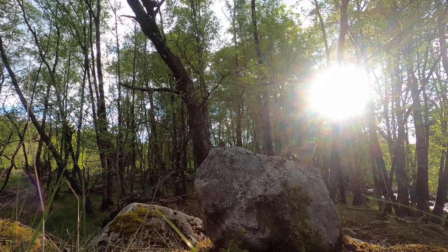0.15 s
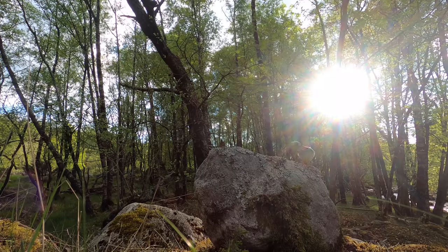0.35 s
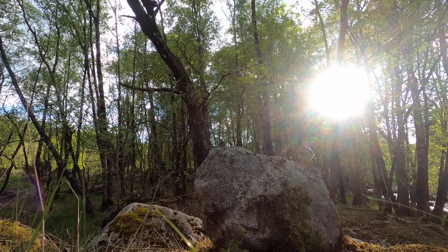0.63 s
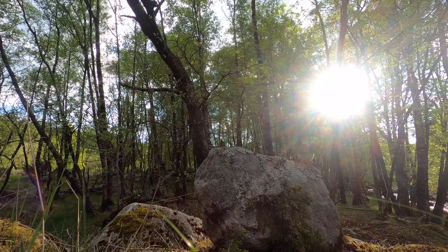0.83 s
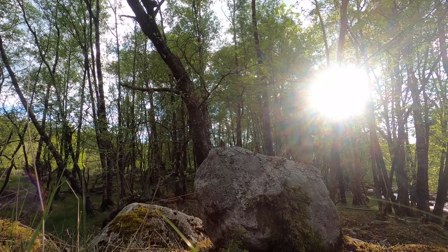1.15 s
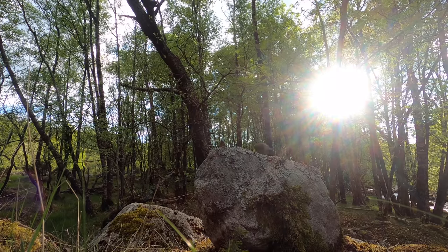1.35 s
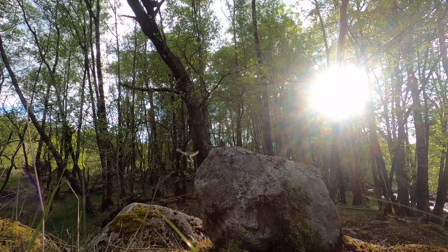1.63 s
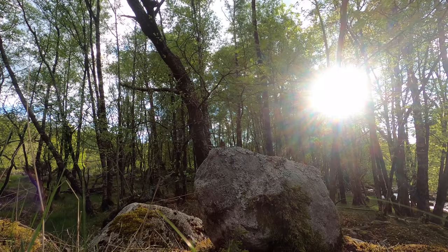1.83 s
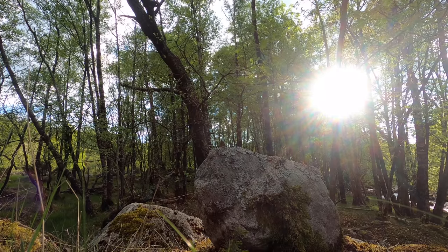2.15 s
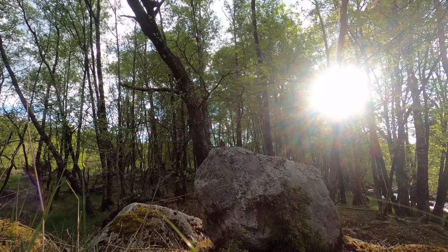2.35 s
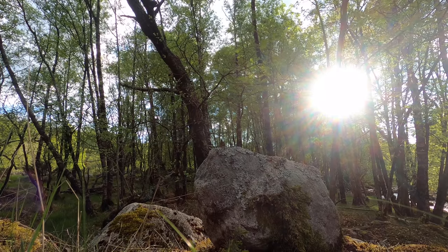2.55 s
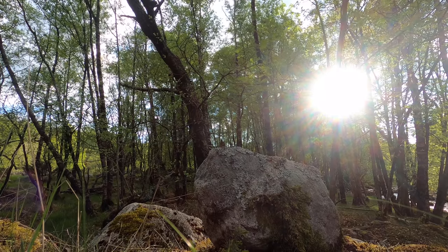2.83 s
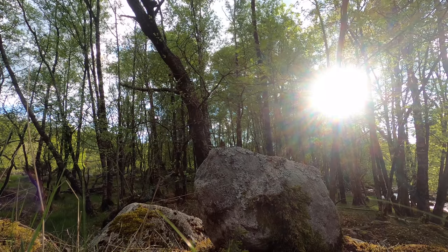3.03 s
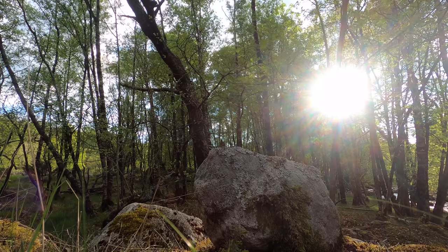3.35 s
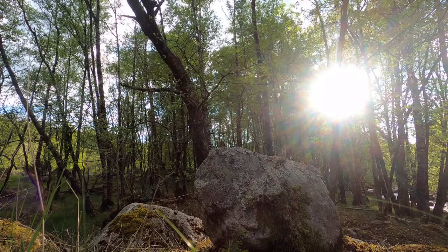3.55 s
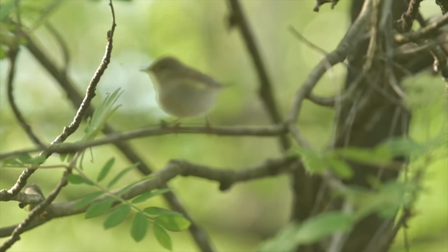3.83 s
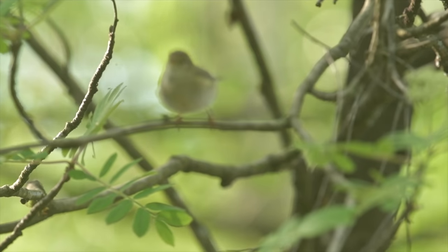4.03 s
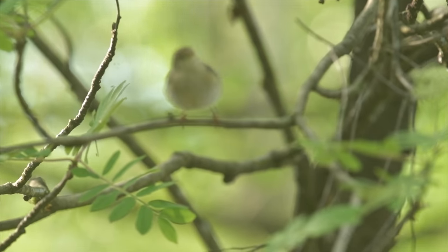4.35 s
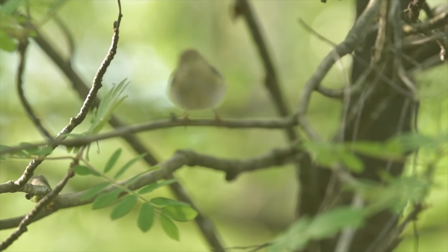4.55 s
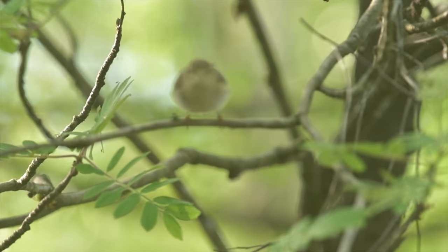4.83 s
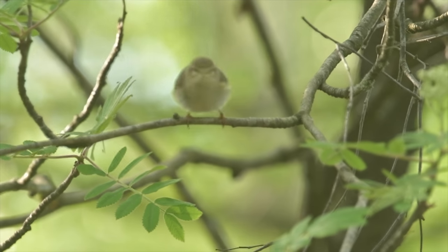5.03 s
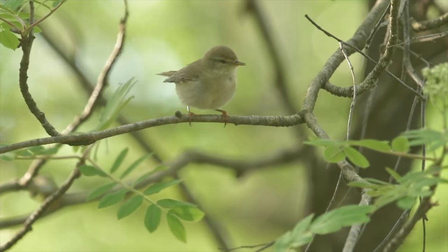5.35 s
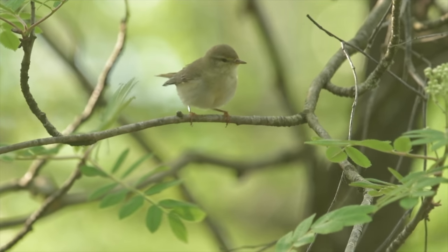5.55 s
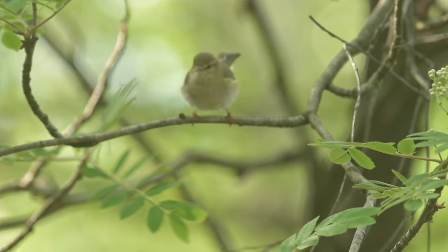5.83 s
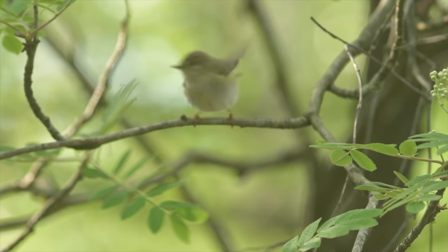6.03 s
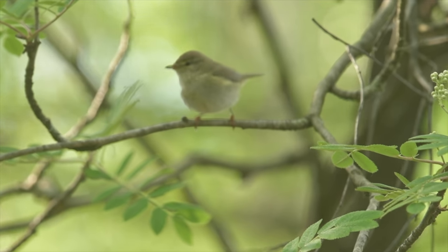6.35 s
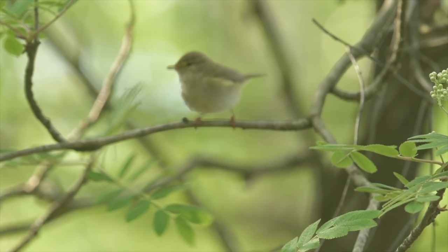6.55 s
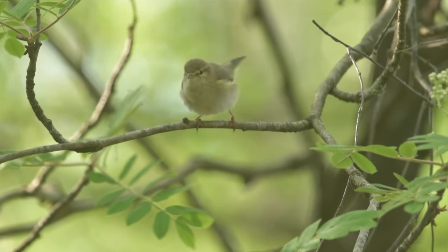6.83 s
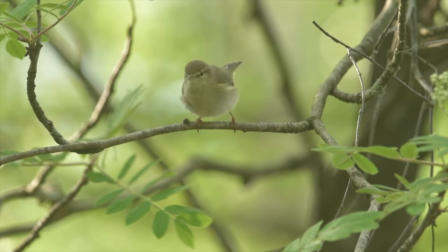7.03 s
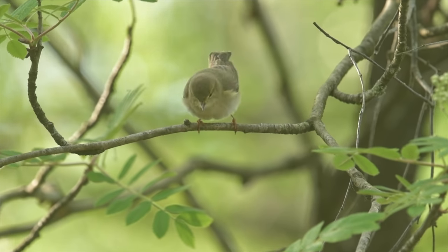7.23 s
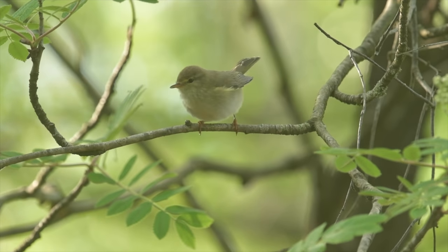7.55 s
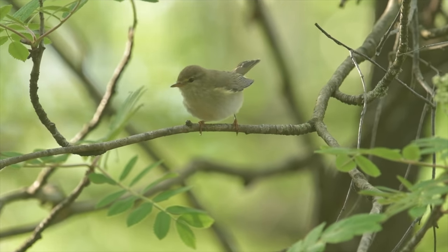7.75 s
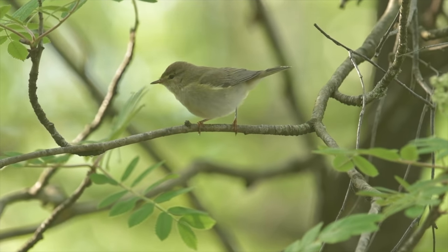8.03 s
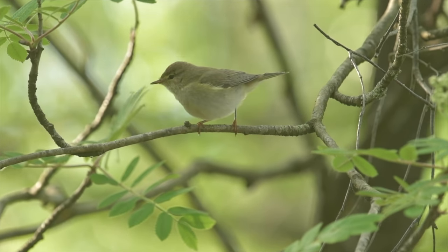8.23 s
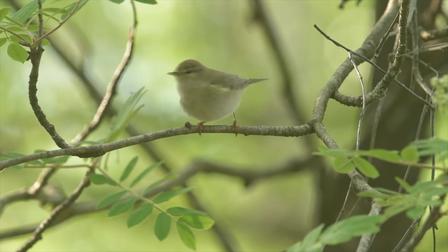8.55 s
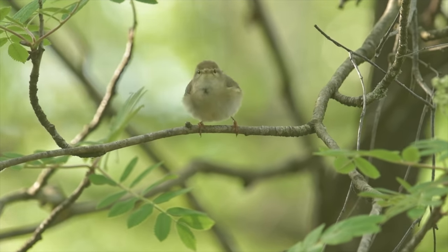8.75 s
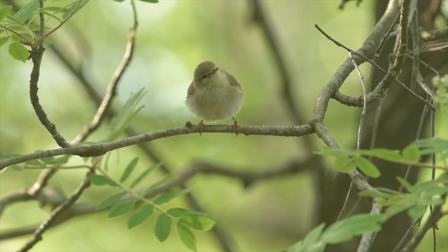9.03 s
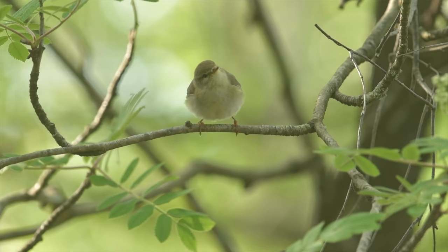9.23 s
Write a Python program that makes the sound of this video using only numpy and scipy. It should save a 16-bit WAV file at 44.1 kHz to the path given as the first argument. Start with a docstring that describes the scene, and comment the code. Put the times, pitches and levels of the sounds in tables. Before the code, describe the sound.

Several small songbirds take turns at different distances among trees. The closest sings rounded, gliding whistles first and ends on a low drop; remote birds answer with quick high slides, steady whistles and a wavering trill on the left. A quiet warbler phrase descends, then a clearer singer finishes with sinking syllables. Two faint wooden creaks come early, over a soft airy stereo background with deep rumble and an almost inaudible regular throb.

```python
"""A quiet wood: willow warblers sing falling phrases of pure whistled notes, scattered by the trunks.
Farther off, birds add high slurs, level whistles, a fast trill and a random twitter; each note is a gliding tone.
A tree creaks twice, in runs of slips that ring one resonance of the trunk.
Under it lie shaped noise for the distant rush and microphone hiss, a deep rumble and a faint regular throb."""
import sys
import numpy as np
from scipy import signal
from scipy.io import wavfile
from scipy.ndimage import uniform_filter1d

SR = 44100
rng = np.random.default_rng(int(sys.argv[2]) if len(sys.argv) > 2 else 0)


def store_pcm(level_fs):
    """Save levels as 16-bit WAV."""
    pcm = np.round(np.clip(level_fs, -1, 1) * 32767).astype(np.int16)
    wavfile.write(sys.argv[1], SR, np.atleast_2d(pcm).T)


N = 413658
TIME = np.arange(N) / SR


def gain_of(db):
    """Decibels to amplitude."""
    return 10 ** (np.asarray(db) / 20)


def evened(x):
    """Scales to rms 1."""
    return x / np.sqrt(np.mean(x ** 2) + 1e-20)


def read(points, hz):
    """Reads a table of (frequency [Hz], value) on a log-frequency axis."""
    f, value = np.transpose(points)
    return np.interp(np.log(hz + 1), np.log(f + 1), value)


def add(mix, s, sound):
    """Mixes a sound in at time s, in place."""
    part = mix[max(round(s * SR), 0):][:len(sound)]
    part += sound[:len(part)]


def filtered(x, hz, kind, order=2):
    """Butterworth filter."""
    return signal.sosfilt(signal.butter(order, hz, kind, fs=SR, output="sos"), x)


def drift(t, rate):
    """Random wandering about 0: normal draws, rate of them a second, joined by straight lines."""
    return np.interp((t - t[0]) * rate, np.arange(1024), rng.standard_normal(1024))


def sing(notes, waver=0.0028, flutter_db=1.5, overtone_db=-44):
    """Each note is one nearly pure tone of the syrinx gliding along its contour."""
    song = np.zeros(N)
    for note in notes:
        s, pitch_hz, level_db = np.transpose(note)
        t = np.arange(s[0] - .002, s[-1] + .002, 1 / SR)
        contour_hz = uniform_filter1d(np.interp(t, s, pitch_hz), size=220, mode="nearest")
        hz = contour_hz * (1 + waver * drift(t, 303.0))
        breath = np.interp(t, s, gain_of(level_db)) * gain_of(flutter_db * drift(t, 141))
        edges = signal.windows.tukey(len(t), min(1, 0.0076 * SR / len(t)))
        phase = 2 * np.pi * np.cumsum(hz) / SR
        tone = np.sin(phase) + gain_of(overtone_db) * np.sin(2 * phase)
        add(song, t[0], np.sqrt(2) * breath * edges * tone)
    return song


def repeated(syllable, rows):
    """The notes of one syllable sung again and again at new pitches and levels."""
    return [[(s + after, hz * factor, db + accent) for after, factor, accent in stroke]
            for s, hz, db in rows for stroke in syllable]


def glide(s, length, first_hz, middle_hz, last_hz, db, change_db=0, linger=0, edge_db=-7):
    """A note that bends through three pitches, softer at both ends; linger below 0 hurries the middle."""
    u = np.linspace(-1, 1, 17)
    travel = u + linger * (u * u * u - u)
    ends = u ** 8
    bend_hz = ((first_hz + last_hz) / 2 - middle_hz) * u ** 2
    hz = middle_hz + (last_hz - first_hz) / 2 * travel + bend_hz
    return np.c_[s + length * (u + 1) / 2, hz, db + change_db * u / 2 + edge_db * ends]


def slurs(rows, sag=.12):
    """Quick glides up or down that linger in the middle, which sags by a share of the span."""
    notes = []
    for s, length, first, last, db in rows:
        middle = (first + last) / 2 - sag * abs(last - first)
        notes.append(glide(s, length, first, middle, last, db, edge_db=-2, linger=0.454))
    return notes


def scatter(t60, delay, count):
    """Echoes from count trunks and branches, different at each microphone, dying away; energy 1."""
    taps = np.zeros((2, SR))
    for side in taps:
        late = rng.random(count) * min(t60, .9)
        side[((late + delay) * SR).astype(int)] = rng.choice([-1, 1], count) * gain_of(-60 * late / t60)
    return taps / np.linalg.norm(taps, axis=1, keepdims=True)


def wood(x, pan_db, near_db, far_db, near_t60=.15, far_t60=.85, shared=0.47):
    """Direct sound, quick echoes from the nearest trunks and the long tail; pan_db is left minus right."""
    near, same = scatter(near_t60, .002, count=120), np.clip(shared, 0, 1)
    # trunks ahead reach both microphones alike
    near[1] = same * near[0] + np.sqrt(1 - same ** 2) * near[1]
    far = scatter(far_t60, .025, count=1500)
    echoes = gain_of(near_db) * near + gain_of(far_db) * far
    heard = x + signal.fftconvolve(x[None], echoes, axes=1)[:, :N]
    return heard * gain_of(np.array([[1], [-1]]) * pan_db / 2)


# Spectrum of the wood's rush and hiss at the microphones: (frequency [Hz], relative density [dB])
AIR_SPECTRUM = [(25, -13), (60, -1), (120, 0), (200, -7.0), (400, -15.5), (800, -9.5), (1200, -8.5),
                (2000, -13.5), (3000, -17), (4500, -22.5), (7000, -22.5), (10000, -29), (15400, -33.5)]
# Likeness of the two microphones: (frequency [Hz], correlation [0 to 1])
AIR_LIKENESS = [(60, 0.62), (130, 0.27), (290, 0.41), (640, 0.55), (1410, 0.79), (3100, 0.61), (6820, 0.37),
                (15000, 0.032)]
# Balance of the two microphones: (frequency [Hz], left minus right [dB])
AIR_LEAN = [(60, 5.5), (130, -5), (290, 0), (640, -4.5), (1410, -4.0), (3100, -2.5), (6820, -1.5),
            (15000, 0)]


def air(level_db=-51, patchy_db=0.85):
    """The far rush of the wood and the microphones' hiss: shaped noise with slight drifting patches."""
    frames, hz = N // 512 + 5, np.fft.rfftfreq(2048, 1 / SR)
    a, b, c, d, patches = rng.standard_normal((5, frames, len(hz)))
    patches = uniform_filter1d(patches, size=14, axis=0)
    patches = evened(uniform_filter1d(patches, size=20, axis=1))
    same = np.clip(read(AIR_LIKENESS, hz), -1, 1)
    left = a + 1j * b
    right = same * left + np.sqrt(1 - same ** 2) * (c + 1j * d)
    lean_db = np.array([1, -1])[:, None, None] * read(AIR_LEAN, hz) / 2
    spectra = np.array([left, right]) * gain_of(read(AIR_SPECTRUM, hz) + patchy_db * patches + lean_db)
    noise = signal.istft(spectra.transpose(0, 2, 1), nperseg=2048, noverlap=1536)[1][:, :N]
    return gain_of(level_db) * noise / np.std(noise.mean(0))  # level of the two sides averaged


def rumble(level_db=-52.5, top_hz=30.3, bottom_hz=7.1, own_db=-11):
    """Deep band of noise, mostly common to both microphones."""
    noise = rng.standard_normal(N) + gain_of(own_db) * rng.standard_normal((2, N))
    low = filtered(noise, top_hz, "low")
    return gain_of(level_db) * evened(filtered(low, bottom_hz, "high"))


def throb(peak_db=-38.5, width=0.0073, corner_hz=8, swing=0.67, swing_lag=0.027):
    """A soft, strictly regular push and slower pull, below the bass."""
    start_s, period_s = .1825, .22752
    offset = (TIME - start_s + period_s / 2) % period_s - period_s / 2
    push = np.exp(-(offset / width) ** 2 / 2)
    pull = np.exp(-((offset - swing_lag) / (2 * width)) ** 2 / 2)
    pulses = filtered(push - swing * pull, corner_hz, "high", order=1)
    return gain_of(peak_db) * pulses / pulses.max()


# Distant twitter, before its place in the wood: (time [s], middle pitch [Hz], level [dB])
TWITTER_COURSE = [(2.55, 4360, -68), (3.3, 4500, -63.5), (3.6, 4580, -63), (4.3, 4700, -74)]


def twitter(per_s=34, spread=.24, length=.035, slur=.17):
    """Short falling slurs of random pitch from birds too far off to tell apart."""
    s, middle_hz, level_db = np.transpose(TWITTER_COURSE)
    starts = np.arange(s[0], s[-1], 1 / per_s)
    notes = []
    for start, (late, pitch) in zip(starts, rng.uniform(-1, 1, (len(starts), 2))):
        hz = np.interp(start, s, middle_hz) * (1 + spread * pitch)
        db = np.interp(start, s, level_db)
        start = start + late / per_s / 2
        notes.append([(start, hz, db), (start + length, hz * (1 - slur), db)])
    return sing(notes)


# Single slurs from deeper in the wood, before their place:
# (start [s], length [s], first pitch [Hz], last pitch [Hz], level [dB])
DEEP_WOOD_NOTES = [(.002, 0.018, 4930, 4870, -48), (2.75, 0.022, 5670, 5160, -56),
                   (2.838, .072, 6520, 6230, -62), (2.87, .06, 4100, 3900, -63),
                   (3.125, .06, 3850, 4000, -63), (4.435, 0.039, 4120, 4080, -60),
                   (5.895, 0.057, 3610, 3240, -60)]


def distant_birds():
    """Single gliding slurs and the twitter, with echoes of the nearest trunks louder than the direct sound."""
    birds = sing(slurs(DEEP_WOOD_NOTES)) + twitter()
    return gain_of(-5.5) * wood(birds, pan_db=1.5, near_db=3.5, far_db=0.0)


# Two creaks, before their place: (start [s], length [s], mean slip rate [1/s], level [dB])
CREAK_RUNS = [(.33, 0.31, 57, -55.5), (1.155, .41, 68, -51)]


def creak(unevenness=.1, slip_db=2.0):
    """Wood rubs on wood: a quick run of slips, each ringing one resonance of the trunk."""
    trunk_hz, damping_hz = 1444, 180
    attack_s, release_s = 0.029, .08
    out = np.zeros(N)
    age = np.arange(900) / SR
    ring = age * np.exp(-np.pi * damping_hz * age) * np.sin(2 * np.pi * trunk_hz * age)
    for s, length, rate, level_db in CREAK_RUNS:
        t = np.arange(0, length, 1 / SR)
        turns = np.cumsum(rate * (1 + unevenness * drift(t, 60))) / SR
        # one slip at each whole turn
        slips = np.diff(np.floor(turns), prepend=-1) * gain_of(slip_db * drift(t, 61))
        pressure = np.minimum(1, np.minimum(t / attack_s, (length - t) / release_s))
        ringing = evened(np.convolve(slips, ring)[:len(t)])
        add(out, s, ringing * pressure * gain_of(level_db))
    return out


def creaking_tree():
    """The slipping tree, left of the microphones, with strong echoes off the nearest trunks."""
    creaks = creak(unevenness=0.15, slip_db=2.0)
    return gain_of(-3.5) * wood(creaks, pan_db=8.5, near_db=2, far_db=-5)


# The three strokes of a trill syllable: (time after its start [s], pitch factor, accent [dB])
TRILL_STROKES = [
    [(0, 1.28, -13), (.006, 1.04, 3), (.016, .97, -2)],
    [(.019, .8, 0), (.029, 1, -1), (.035, .78, -5), (.053, .7, 0.5)],
    [(.056, .93, -8), (.066, 1.09, 0), (.074, 1.15, 3), (.083, 1.2, -20)],
]
# The trill swells as it sinks; before its place: (time [s], pitch [Hz], level [dB])
TRILL_COURSE = [(3.85, 4750, -73), (4.33, 4690, -62.5), (4.7, 4404, -58), (5.09, 4066, -57.5),
                (5.75, 3870, -58)]


def trill(count=16):
    """One syllable repeated in a slowing, sinking run."""
    start_s, first_gap_s, slowing_s = 3.848, .1181, .00126  # each gap is longer by slowing_s
    k = np.arange(count)
    starts = start_s + k * first_gap_s + k * (k - 1) / 2 * slowing_s
    s, hz, db = np.transpose(TRILL_COURSE)
    return repeated(TRILL_STROKES, zip(starts, np.interp(starts, s, hz), np.interp(starts, s, db)))


def trilling_bird():
    """The farther bird of the trill, well to the left, its tone wavering."""
    song = sing(trill(), waver=0.015, flutter_db=2.5)
    return gain_of(-3.0) * wood(song, pan_db=10.0, near_db=-1, far_db=-6.0)


# A whistle that drops and levels out: (time after its start [s], pitch factor, accent [dB])
WHISTLE_SHAPE = [
    [(0, 1.14, -10), (.02, 1.07, -4), (.045, 1.02, -3), (.085, 1, 1), (.12, .992, -2), (.17, .988, -21)],
]
# The whistles, before their place: (time [s], pitch [Hz], level [dB])
WHISTLE_NOTES = [(2.135, 3600, -59), (2.372, 3446, -56), (2.63, 3354, -56.5), (2.915, 3160, -51.5),
                 (3.17, 3140, -52), (8.12, 3580, -58.5), (8.37, 3454, -54.5), (8.625, 3420, -56),
                 (8.885, 3166, -51.5), (9.165, 3100, -53)]


def whistling_bird():
    """Level whistles of a farther bird, to the right, with a long tail of the wood."""
    song = sing(repeated(WHISTLE_SHAPE, WHISTLE_NOTES), waver=0.0079, flutter_db=3.5)
    return gain_of(-3.0) * wood(song, pan_db=-4.5, near_db=0, far_db=-2.5, near_t60=.18, far_t60=0.99)


# A far bird's thin slurs, before its place:
# (start [s], length [s], first pitch [Hz], last pitch [Hz], level [dB])
HIGH_SLURS = [(1.566, 0.035, 3630, 5200, -63), (1.63, .075, 6900, 5420, -64),
              (1.765, 0.046, 4130, 6500, -53.5), (1.805, 0.032, 6650, 6520, -61),
              (1.908, 0.088, 6470, 4100, -52.5), (2.068, .1, 6570, 3950, -52.5),
              (2.18, 0.13, 7260, 6400, -62.5), (2.606, 0.048, 8200, 6700, -59),
              (2.696, 0.049, 7700, 6800, -60.5), (2.84, .085, 5660, 5180, -55.5),
              (3.002, 0.095, 5730, 5170, -59), (3.158, 0.066, 7300, 6800, -63),
              (3.286, 0.052, 7050, 5300, -56), (3.402, 0.06, 5900, 5060, -57)]


def high_bird():
    """A far bird's quick high glides, with strong echoes off the nearest trunks."""
    song = sing(slurs(HIGH_SLURS), waver=0.01, flutter_db=3.0)
    return gain_of(-4) * wood(song, pan_db=2.0, near_db=3, far_db=-4, near_t60=.22, far_t60=.8)


# The warblers' syllables by name, point by point:
# (place [-1 start, 0 turning point, 1 end], pitch factor, accent [dB])
SYLLABLE_SHAPES = { "peak": [(-1, .87, -8.5), (-.5, .88, -3), (0, 0.99, 2.5), (.4, .92, -4),
                   (0.98, .73, -1.5)], "swing": [(-1, 1.03, -16), (-.92, 1.23, -0.5), (-0.75, 1.03, 0),
                   (-.54, 1.005, -6), (-.35, 1.12, -1), (-.18, 1.31, 1), (0, 1.52, -5), (.48, 1.37, 0),
                   (0.92, 1.11, -9)], "wave": [(-1, 1.23, -12), (-.86, 1.15, 1), (-.62, 1, -3),
                   (-.4, 1.08, -4.5), (-.14, 1.28, -1), (.05, 1.31, -1), (1, 1.04, -6)],
                   "arch": [(-1, .765, -8), (-.6, .82, 3.5), (-.28, .92, 1.5), (0, 0.99, -11),
                   (.4, .93, -4), (1, .78, -2)], "hook": [(-1, 1.05, -5.5), (-.62, 1.012, -5.5), (0, 1, 2),
                   (.55, .93, 0), (0.97, 0.65, -12)], "spike": [(-1, .955, -10), (-.8, .985, 3.5),
                   (-.3, 1.03, 0), (-.18, 1.13, -10), (0, 1.33, -19), (.17, 1.12, -12), (.28, .985, 0.5),
                   (.55, .875, -0.5), (0.99, .815, -4)], "step": [(-1, .77, 0), (-0.81, .805, -0.5),
                   (-0.38, .8, -3.5), (-0.017, 0.99, -0.5), (0.49, 1, 1), (1, 0.98, -15)],
                   "flick": [(-1, .77, -11), (-.35, .76, 0), (0, 1.06, -3), (0.43, .99, 2.5),
                   (1, .955, -2)], }


def syllables(rows):
    """Stretches each syllable's shape to its length, pitch and depth of sweep."""
    notes = []
    for s, before, after, hz, depth, db, name in rows:
        place, factor, accent_db = np.transpose(SYLLABLE_SHAPES[name])
        times = s + place * np.where(place < 0, before, after)
        notes.append(np.c_[times, hz * factor ** depth, db + accent_db])
    return notes


# The middle phrase, before its place: (turning point [s], length before it [s], length after it [s],
# pitch [Hz], depth of the sweep [exponent], level [dB], syllable)
MIDDLE_PHRASE = [(5.79, 0.043, 0.087, 7270, 1.1, -58, "arch"),
                 (6.783, 0.046, .079, 7300, 1.07, -57.5, "arch"),
                 (6.926, 0.026, 0.039, 5240, 1.05, -61, "spike"),
                 (7.085, 0.032, 0.045, 5620, 1.1, -58, "spike"),
                 (7.256, .031, 0.044, 5600, 1, -57, "spike"),
                 (7.438, 0.05, 0.034, 4720, 0.92, -55.5, "flick"),
                 (7.6, 0.05, 0.032, 4680, 1, -55, "flick"), (7.745, .033, .05, 4400, 1.15, -56, "peak")]


def middle_warbler():
    """Whistled syllables from the left among the trunks."""
    song = sing(syllables(MIDDLE_PHRASE))
    return gain_of(-2) * wood(song, pan_db=8.5, near_db=-1.5, far_db=-7.5)


# The closing phrase, before its place: (turning point [s], length before it [s], length after it [s],
# pitch [Hz], depth of the sweep [exponent], level [dB], syllable)
CLOSING_PHRASE = [(8.086, 0.054, 0.083, 7280, 1.07, -52, "arch"),
                  (8.315, .072, 0.023, 5600, 1.3, -48.5, "hook"),
                  (8.475, 0.07, 0.02, 5505, 0.77, -43, "hook"),
                  (8.643, .075, 0.022, 5370, 0.69, -42.5, "hook"),
                  (8.773, 0.041, 0.046, 5110, 1.06, -40.5, "spike"),
                  (8.933, .047, .045, 5060, 1, -40, "spike"),
                  (9.115, 0.057, .043, 4650, 0.96, -39.5, "step"),
                  (9.283, 0.061, 0.045, 4657, 1.09, -37.5, "step")]
# The closing singer's place as it turns its head: (time [s], left minus right [dB])
HEAD_TURN = [(8.3, 0.5), (8.8, 3.5), (9.1, 0.5)]


def closing_warbler():
    """Whistled syllables whose balance between the microphones moves as the singer turns its head."""
    turning_db = np.interp(TIME, *np.transpose(HEAD_TURN))
    song = sing(syllables(CLOSING_PHRASE))
    return gain_of(-2.5) * wood(song, pan_db=turning_db, near_db=-1.5, far_db=-9, near_t60=.22, shared=0.14)


def scooped(note, under=0.148, settle_s=.008):
    """Starts a note below its pitch and pulls it up."""
    s, hz, db = np.transpose(note)
    return np.c_[s, hz * (1 - under * np.exp(-(s - s[0]) / settle_s)), db]


def drop(steepness=1.57, release_db=-10):
    """The near phrase's last note: pitch and level sink together and settle."""
    start_s, length_s, settle_s = 1.381, .12, .023
    from_hz, to_hz = 3380, 2060
    level_db, fade_db = -41, -9
    u = np.linspace(0, 1, 25)
    high = np.exp(-(u * length_s / settle_s) ** steepness)
    hz = to_hz + (from_hz - to_hz) * high
    return np.c_[start_s + u * length_s, hz, level_db + fade_db * (1 - high) ** 2 + release_db * u ** 2]


# The near phrase, before its place: (turning point [s], length before it [s], length after it [s],
# pitch [Hz], depth of the sweep [exponent], level [dB], syllable)
NEAR_PHRASE = [(.203, 0.045, 0.065, 3807, 0.97, -37, "peak"),
               (.448, 0.12, 0.031, 2443, 1.06, -40.5, "swing"), (.645, .115, .031, 2438, .98, -39, "swing"),
               (.842, .102, 0.046, 2464, 1, -39.5, "wave")]
# The near bird's drawn-out glides, before the scoop and its place: (start [s], length [s], first pitch [Hz],
# middle pitch [Hz], last pitch [Hz], level [dB], change of level [dB], lingering [below 0 hurries])
DRAWN_OUT_GLIDES = [(.008, .092, 2720, 4000, 4520, -40, -2, -.35),
                    (.959, .115, 2380, 2903, 2600, -42, 0, 0),
                    (1.133, .177, 2750, 2940, 3600, -46, -3.5, .25)]


def near_warbler():
    """The nearest singer, almost central: whistled syllables, scooped glides and a last drop."""
    glides = [scooped(glide(*row)) for row in DRAWN_OUT_GLIDES]
    song = sing(syllables(NEAR_PHRASE) + glides + [drop()])
    return gain_of(-1.0) * wood(song, pan_db=0.5, near_db=-4.5, far_db=-14.5, shared=0.25)


def scene():
    """Each singer at its own place among the trees, over the background."""
    background = air() + rumble() + throb()
    farther = distant_birds() + creaking_tree() + trilling_bird() + whistling_bird() + high_bird()
    warblers = middle_warbler() + closing_warbler() + near_warbler()
    return background + farther + warblers


def record(dry):
    """The recorder's band limit: a steep low-pass."""
    edge_hz = 15740
    lowpass = signal.firwin(1023, edge_hz, window=("kaiser", 9), fs=SR)
    return signal.oaconvolve(dry, lowpass[None], "same")


dry = scene()
out = record(dry)
store_pcm(out)
```